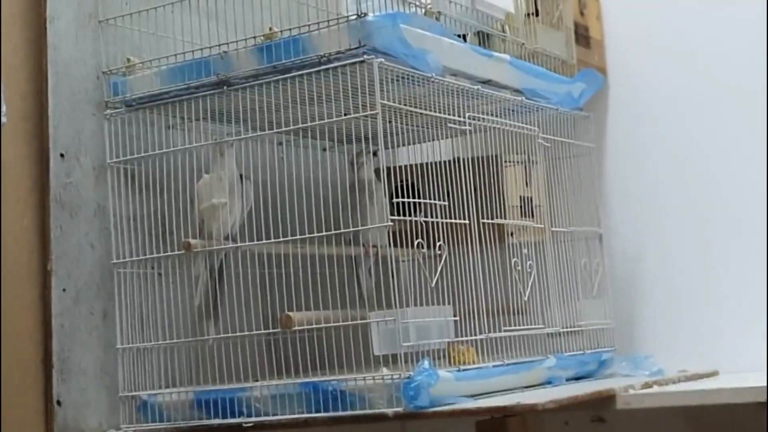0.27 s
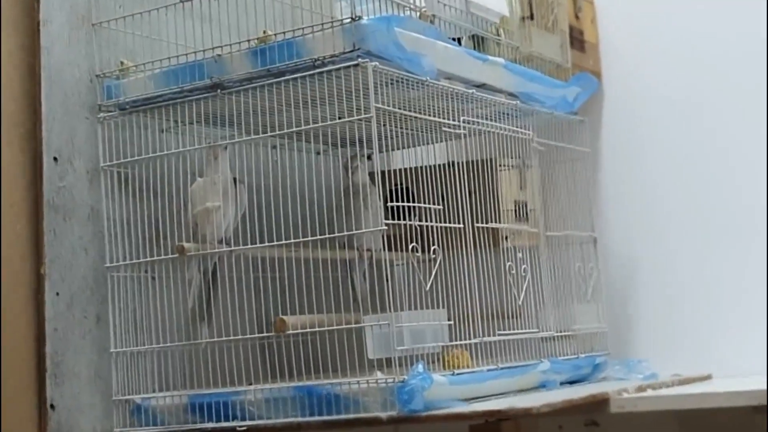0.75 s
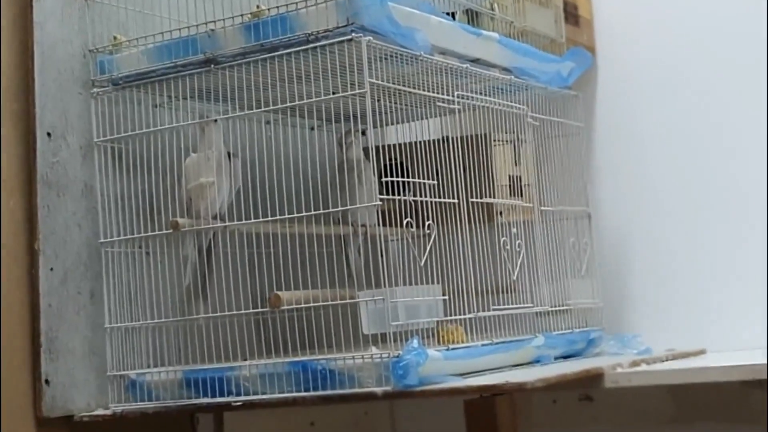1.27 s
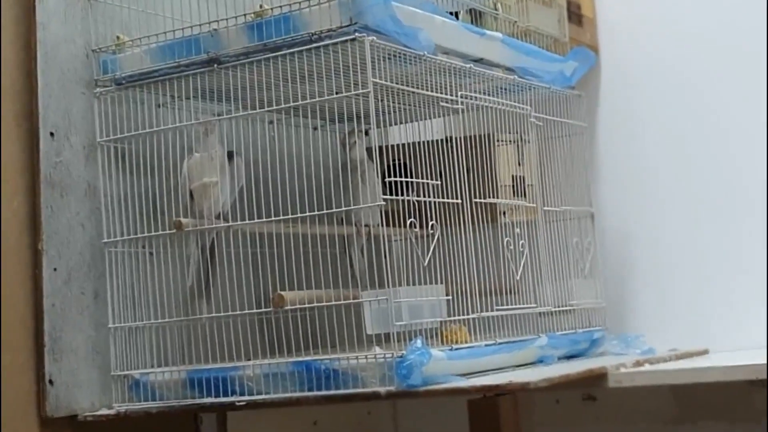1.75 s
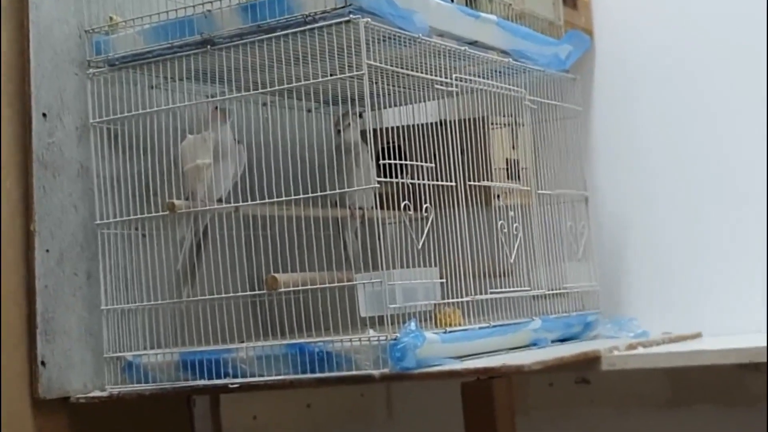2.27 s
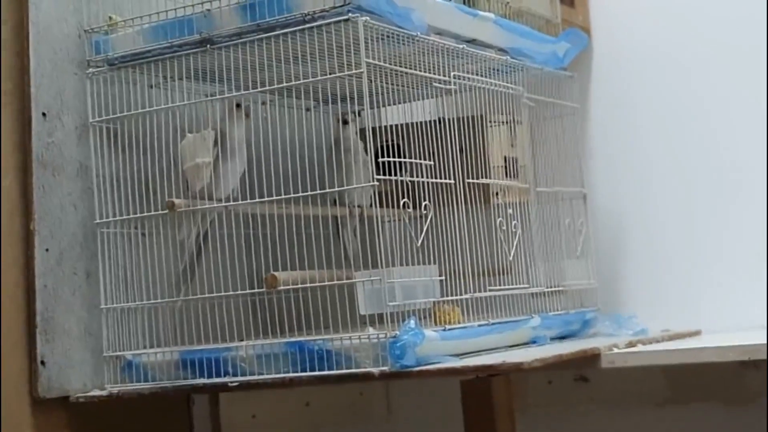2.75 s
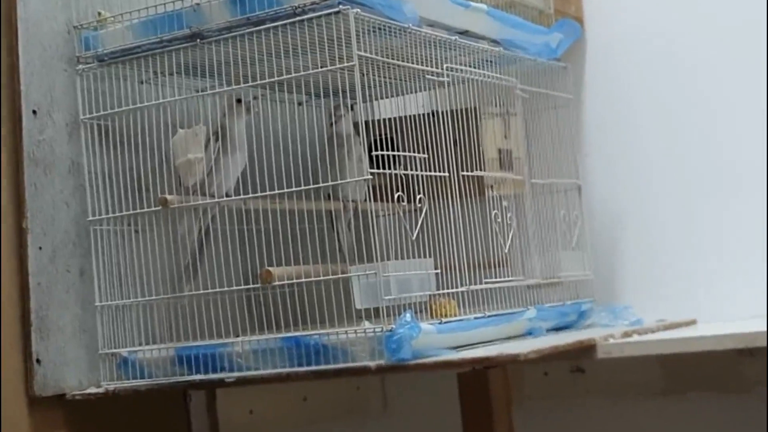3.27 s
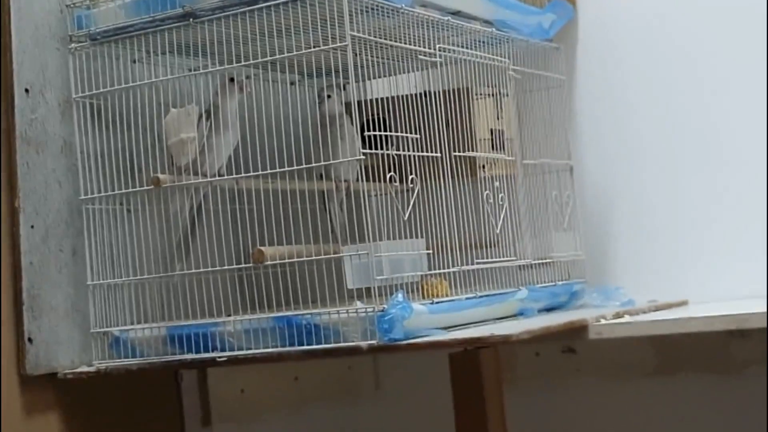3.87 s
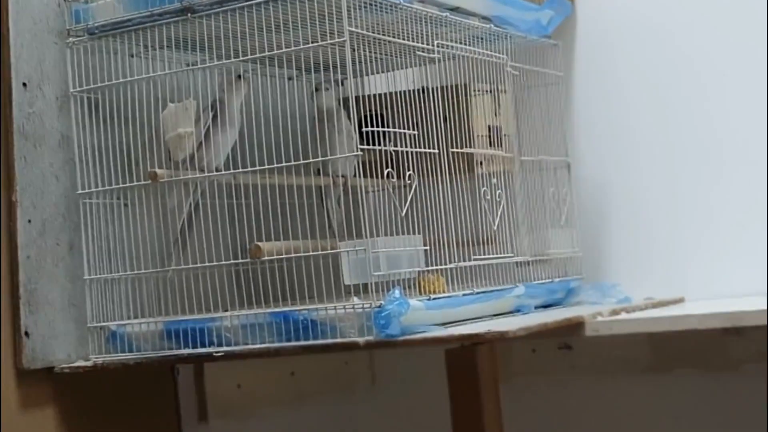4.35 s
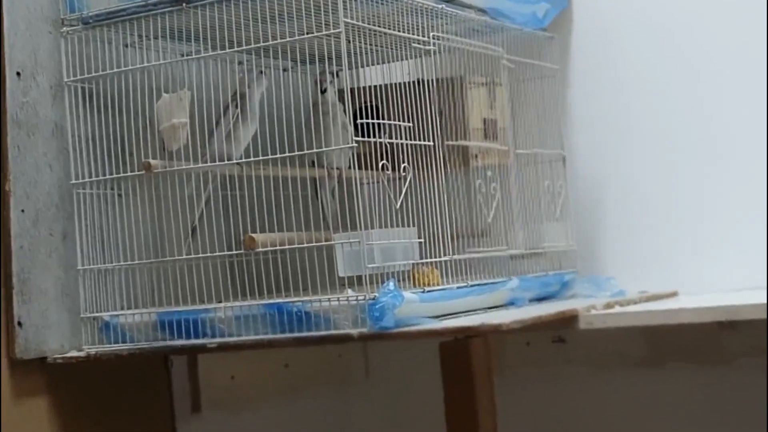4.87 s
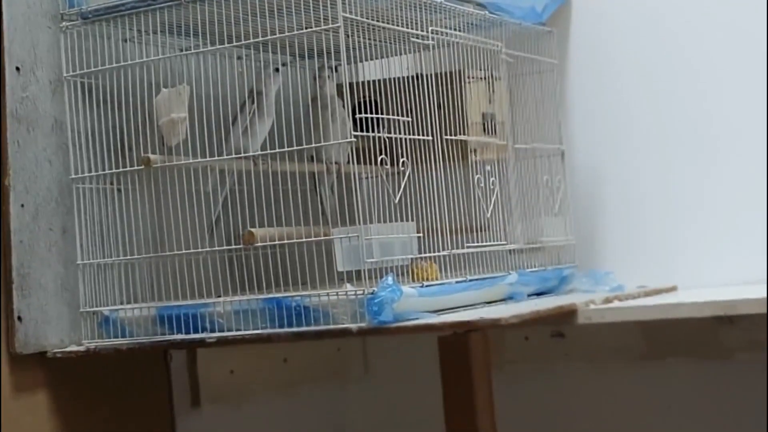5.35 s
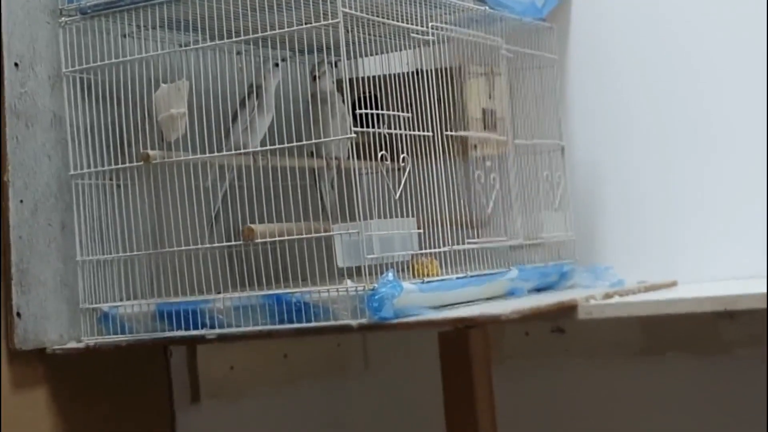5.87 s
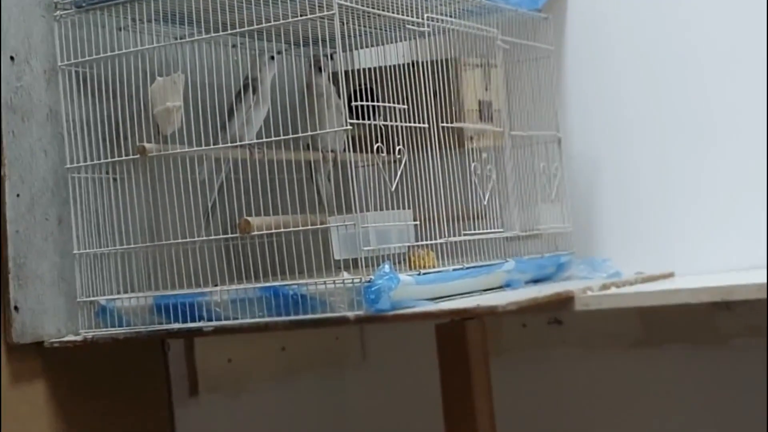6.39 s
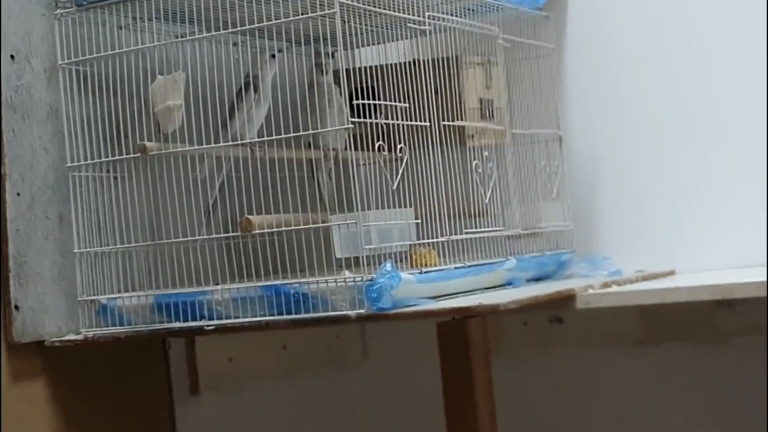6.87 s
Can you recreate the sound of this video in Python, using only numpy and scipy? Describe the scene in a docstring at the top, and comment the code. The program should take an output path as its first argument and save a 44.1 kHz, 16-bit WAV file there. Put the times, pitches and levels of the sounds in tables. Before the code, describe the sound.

Motors hum low in a small, hard-walled room. Something bumps dully elsewhere in the house and leaves a fading rumble. A cockatiel in a wire cage gives two harsh chirps and some soft warbles, then five louder rising whistles, each answered by a thin, hoarse note that hooks downward. One last quiet warble follows. The bird is fairly near the microphone, slightly to the right, with a short echo.

```python
"""A cockatiel in a wire cage in a small hard-walled room. Two motors hum and beat slowly throughout.
At 0.4 s something bumps dully elsewhere in the house and leaves a low rumble. From 1.2 s the bird sings,
its syrinx buzzing through throat and beak: two harsh chirps, soft warbles, a thin note that hooks down.
From 2.7 s come five rising whistles, each answered by such a hook; at 5.5 s, a last quiet warble."""
import sys
import numpy as np
from scipy import signal
from scipy.fft import rfft, irfft, next_fast_len
from scipy.io import wavfile
from scipy.ndimage import uniform_filter1d

SR = 44100
rng = np.random.default_rng(int(sys.argv[2]) if len(sys.argv) > 2 else 0)


def put_to_file(sound):
    """Save the sound as 16-bit audio at rate SR, in the file named by the first command-line argument."""
    columns = np.atleast_2d(sound).T  # one column per channel
    safe = np.clip(columns, -1, 1)
    whole_steps = np.round(safe * 32767)
    wavfile.write(sys.argv[1], SR, whole_steps.astype(np.int16))


N = 313992
TIME_S = np.arange(N) / SR
BINS_HZ = np.arange(N // 2 + 1) * SR / N

# room noise: (frequency [Hz], relative density [dB])
AIR_COLOUR = [(12, -39.5), (22, -15.5), (45, -6.5), (75, -19.5), (105, -16), (170, -14), (250, -15),
              (345, -21), (600, -23.5), (880, -27.5), (2900, -40), (6300, -52.5), (9000, -62), (16000, -65)]
# diffuse sound: (frequency [Hz], left-right correlation [0-1])
CORRELATION = [(30, 0.77), (170, 1), (350, .62), (700, 0.31), (1500, 0.025), (12000, 0.032)]
# deep hum: (time [s], level [dB])
MOTOR_LEVEL = [(0, -43.5), (3.8, -45), (5, -50), (6.3, -45.5)]
# higher motor lines: (frequency [Hz], level [dB], sway [dB])
MOTOR_LINES = [(57.6, -55, 1), (100, -56.5, 1), (114.9, -59, 1), (146.8, -55.5, 2), (441, -59, 2)]
# faint rustles: (time [s], level [dB], half length [s])
RUSTLES = [(.37, -68.5, 0.1), (2.634, -61, 0.0042), (4.326, -60, 0.0027), (5.988, -74, 0.2)]
# knocks of the bump: (start [s], level [dB], rise [s], t60 [s])
KNOCKS = [(0.367, -33.5, 0.019, 0.47), (.398, -33.5, 0.0096, 0.25), (0.423, -29, 0.0031, 0.22),
          (.452, -35.5, .004, 1)]
# noise spectra: (frequency [Hz], relative density [dB])
RUSTLE_COLOUR = [(3000, -31), (6000, 6), (9500, -12), (11500, 6), (13200, -2), (16000, -14)]
KNOCK_COLOUR = [(26, -53), (45, -29), (113, -3.5), (146, -15.5), (276, -12.5), (316, -18.5), (542, -17),
                (882, -31.5), (1150, -33.5), (2500, -45), (3250, -91), (5500, -120)]
RUMBLE_COLOUR = [(40, -22), (80, -3), (110, -0.5), (180, -9.5), (400, -24), (1500, -60)]

# listening points, left then right: (x [m], y [m], z [m])
EARS_M = [(1.3, 1.07, 1.4), (1.24, 1.2, 1.41)]
ROOM_M, BIRD_M = (3.7, 2.9, 2.6), (.35, .55, 1.6)
# reverb decay: (frequency [Hz], t60 [s])
ROOM_T60 = [(100, 1), (1400, 0.74), (2300, 0.53), (4000, 0.6), (6000, 0.54), (9000, 0.29), (15000, .25)]
# reverb colour: (frequency [Hz], gain [dB])
ROOM_COLOUR = [(1300, 2), (2200, 2), (3000, 1), (4200, 2), (6000, 1), (8500, 4), (12500, 2.5)]
# echoes off nest box and cage tray: (delay [ms], left gain, right gain)
CAGE_ECHOES = [(.5, 0.039, .1), (2.249, 0.067, 0.1), (3.099, 0.047, -0.12), (5.502, 0.13, 0.16)]
# peaks and dips of the bird's corner: (frequency [Hz], width [Hz], gain [dB])
CORNER_BANDS = [(1445, 90, 1.5), (1538, 51, -0.5), (1980, 17, 0), (2000, 18, -7), (2019.5, 37, 4.5),
                (2076, 67, -1), (2186, 21, 7), (2205, 50, -6.5), (2447, 13, -2), (3167, 50, 2.5),
                (3654, 10, 5.5), (3804, 82, 4.5), (4440, 90, -8.5)]
# direct path, bird facing away: (frequency [Hz], gain [dB])
SHADOW = [(1300, -2.5), (2200, -3), (4000, -1.5), (6000, -2.5), (8500, -3), (12500, -6.5), (16000, -3.5)]

# turbulence in the syrinx: (frequency [Hz], gain [dB])
RASP_TILT = [(700, -40), (1500, -3), (2600, 1.5), (4200, -11.5), (8000, -9.5), (12500, 5)]
# throat and beak response: (frequency [Hz], gain [dB])
CHIRP_THROAT = [(1900, -27), (2600, -0.5), (3200, 3.5), (4000, -4), (4800, -15.5), (5500, -10.5),
                (7600, -20.5), (9000, -52), (10500, -34.5), (14200, -24), (15800, -40)]
WARBLE_THROAT = [(2600, 4), (3000, 3), (3700, -8), (4700, -12), (5800, -17), (7500, -26), (9300, -38),
                 (11500, -21), (14000, -20), (15800, -35)]
WHISTLE_THROAT = [(2800, -3.5), (3500, -0.5), (4000, 2), (4500, -3), (5100, -16.5), (5800, -6.5),
                  (6600, -24.5), (7500, -31), (9300, -35), (10500, -35), (12400, -23), (15500, -31.5)]
HOOK_THROAT = [(2800, -7.5), (4500, -0.5), (5200, 0), (6500, -6.5), (7600, -13), (9500, -21),
               (11000, -10.5), (12400, -1), (14000, -17), (15500, -9.5)]
# note contours: (stage [0 start, 1 top, 2 end], pitch [0 low, 1 top], level [dB], overtones [dB],
# roughness [0-1])
CHIRP_SHAPE = [(0, 0, -21.5, 12, .3), (.45, 0, -11.5, 8, .15), (.72, .66, 2, 2.5, .12),
               (1, 0.97, -1, -3.5, .03), (1.5, .75, -5, -2.5, .7), (2, -0.038, -8, 1.5, .3)]  # thin buzz, leap, break
WHISTLE_SHAPE = [(0, 0, -17.5, -2, .55), (.28, 0.046, -2, -7.5, 0.3), (.52, .28, -8, 7.5, 0.06),
                 (.78, .68, -3, 1.5, 0.2), (1, 1, 0.5, -5.5, 0.2), (1.55, .95, 0.5, -10.5, .08),
                 (2, .72, -9.5, -10.5, 0.2)]  # hold, shrill climb, pure top
HOOK_SHAPE = [(0, .85, -18, 2, 0.2), (.42, .77, -12.5, 3, .1), (.78, .93, -8.5, 4, 0),
              (1, 0.98, 1, -0.5, 0), (1.4, .86, -0.5, 3.5, .22), (1.7, .42, -10, 3, 0.8),
              (2, 0, -23.5, 2.5, 0.6)]  # dip, swell, hoarse dive
# notes, levels added to the contour's: (start [s], climb [s], after top [s], opening [Hz], low [Hz],
# top [Hz], level [dB], opening boost [dB], overtones re fundamental [dB], treble [dB])
CHIRPS = [(1.193, .063, .032, 1315, 1310, 1628, -29, -1, 1.5, 1),
          (1.655, .066, 0.021, 1292, 1318, 1844, -24, -1, -2, 2.5)]
WHISTLES = [(2.683, .07, .068, 1793, 1767, 2173, -13, -3, -6, 2.5),
            (3.251, 0.12, .03, 1793, 1739, 2145, -15.5, -1, -7.5, -0.5),
            (3.867, 0.11, .042, 1753, 1780, 2071, -16, 0.5, -5, -2),
            (4.385, .108, .037, 1831, 1806, 2252, -16, 2, -2, -3.5),
            (4.92, 0.11, 0.021, 1820, 1842, 2153, -14.5, -2.5, -5, 0.5)]
HOOKS = [(2.459, .052, .029, 1766, 1349, 2047, -24, 13, -31, -3.5),
         (2.95, .078, .037, 2235, 1206, 2502, -27.5, 2.5, -31, 2.5),
         (3.565, 0.068, 0.033, 2140, 1330, 2593, -23.5, -1, -35, 0),
         (4.122, 0.081, 0.039, 2466, 1418, 2584, -21.5, -1, -33.5, -0.5),
         (4.638, .085, .041, 2450, 1310, 2543, -18, -0.5, -31.5, 5.5),
         (5.174, 0.084, 0.041, 2370, 1220, 2568, -19, 1, -30, -2.5)]
# soft slurs: (start [s], length [s], opening [Hz], middle [Hz], closing [Hz], level [dB],
# overtones re fundamental [dB], roughness [0-1], treble [dB])
WARBLES = [(1.899, 0.081, 1950, 1485, 1396, -32, -17.5, 0.45, -0.5),
           (2.028, 0.061, 1538, 1325, 1218, -43.5, -12, 0.54, -1),
           (2.183, .04, 1566, 1430, 1336, -39.5, -10.5, .3, 6),
           (2.234, 0.091, 1338, 1456, 1539, -29.5, -9, .12, 3.5),
           (2.421, 0.0417, 2073, 2000, 1800, -33.5, -29, 0.1, 0),
           (5.536, .067, 1286, 1328, 1359, -38.5, -9.5, 0.1, -11),
           (5.601, 0.05, 1370, 1421, 1280, -40.5, -7, 0.11, -3.5)]


def from_db(db):
    """Decibels to gain."""
    return 10 ** (np.asarray(db) / 20)


def unit_rms(x):
    """Scale to unit power."""
    return x / np.sqrt(np.mean(x ** 2) + 1e-20)


def at_hz(table, hz):
    """Interpolate over log frequency."""
    table_hz, value = np.transpose(table)
    return np.interp(np.log(np.maximum(hz, 1)), np.log(table_hz), value)


def wander(rate_hz, size):
    """Low-passed random motion, rms about 1."""
    span = next_fast_len(size + SR // 10)
    hz = np.arange(span // 2 + 1) * SR / span
    return unit_rms(irfft(rfft(rng.standard_normal(span)) / (1 + (hz / rate_hz) ** 4), span))[:size]


def diffuse_noise(colour):
    """Stereo noise, correlated in the bass only; rms 1."""
    mid, side = rfft(rng.standard_normal((2, N))) * from_db(at_hz(colour, BINS_HZ))
    alike = at_hz(CORRELATION, BINS_HZ)
    return unit_rms(irfft(np.sqrt(1 + alike) * mid + np.sqrt(1 - alike) * side * [[1], [-1]], N))


def motors(fast_hz=48.95, slip_hz=.715, in_step_s=3.62, slower_db=-2, drift_hz=.93):
    """Two motors at nearly the same speed beat under unsteady higher lines."""
    rad_per_hz = 2 * np.pi * (TIME_S - in_step_s)
    pair = np.sin(fast_hz * rad_per_hz) + from_db(slower_db) * np.sin((fast_hz - slip_hz) * rad_per_hz)
    hum = from_db(np.interp(TIME_S, *np.transpose(MOTOR_LEVEL))) * pair
    for hz, db, sway_db in MOTOR_LINES:
        gain = from_db(db + sway_db * wander(rate_hz=6, size=N))
        line_hz = hz + drift_hz * wander(rate_hz=3.12, size=N)
        hum += gain * np.sin(2 * np.pi * np.cumsum(line_hz) / SR)
    return np.sqrt(2) * hum


def rustles():
    """Two soft hissy swells and two tiny ticks."""
    envelope = sum(from_db(db) * np.exp(-.5 * ((TIME_S - s) / half_s) ** 2) for s, db, half_s in RUSTLES)
    return envelope * diffuse_noise(RUSTLE_COLOUR)


def rumble(start_s=.37, rise_s=.097, boom_db=-35, boom_t60_s=1, linger_db=-44.5, linger_t60_s=16):
    """The house booms after the bump: quick drop, slow fade."""
    age_s = TIME_S - start_s
    decay_s = np.maximum(age_s - rise_s, 0)
    boom = from_db(boom_db - 60 * decay_s / boom_t60_s)
    linger = from_db(linger_db - 60 * decay_s / linger_t60_s)
    return np.clip(age_s / rise_s, 0, 1) * np.hypot(boom, linger) * diffuse_noise(RUMBLE_COLOUR)


def bump():
    """Muffled knocks, close together, add in power."""
    power = 0
    for start_s, db, rise_s, t60_s in KNOCKS:
        age_s = TIME_S - start_s
        decay = from_db(db - 60 * np.maximum(age_s - rise_s, 0) / t60_s)
        power += decay ** 2 * np.clip(age_s / rise_s, 0, 1)
    return np.sqrt(power) * diffuse_noise(KNOCK_COLOUR)


def wall_reflections(ear_m, order=9, merge_s=.043):
    """Mirror images of the bird arrive ever denser, then merge into noise."""
    n = np.arange(-order, order + 1)
    x, y, z = [(n + n % 2) * side + (1 - 2 * (n % 2)) * bird - ear
               for side, bird, ear in zip(ROOM_M, BIRD_M, ear_m)]
    path_m = np.sqrt(x[:, None, None] ** 2 + y[:, None] ** 2 + z ** 2).ravel()
    sign = 1 - 2 * ((n[:, None, None] + n[:, None] + n) % 2).ravel()
    arrival = np.round((path_m - path_m.min()) / 343 * SR).astype(int)
    distinct = unit_rms(np.bincount(arrival, sign / path_m)[:int(merge_s * SR)])
    return np.concatenate([distinct, rng.standard_normal(SR)[len(distinct):]])


def room(x, early_db=1, early_t60_s=.15, late_db=-8, build_s=.0081):
    """Strong early reflections, then a tail that dies sooner in the treble."""
    t = TIME_S[:SR]

    def decay_power(db, t60_s):
        power = from_db(-60 * t / t60_s) ** 2
        return from_db(db) ** 2 * power / power.sum()

    hz = np.arange(SR // 2 + 1)
    arrivals = rfft([wall_reflections(ear_m) for ear_m in EARS_M])
    centres_hz = np.geomspace(1000, 16000, 9)
    response = 0
    for centre_hz, share in zip(centres_hz, np.eye(len(centres_hz))):
        band = irfft(arrivals * at_hz(np.column_stack([centres_hz, share]), hz), SR)
        power = decay_power(early_db, early_t60_s) + decay_power(late_db, at_hz(ROOM_T60, centre_hz))
        response += band * from_db(at_hz(ROOM_COLOUR, centre_hz)) * np.sqrt(power)
    response *= 1 - np.exp(-t / build_s)  # first reflections are sparse
    return signal.fftconvolve(x[None], response, axes=1)[:, :N]


def corner(x):
    """Narrow peaks and dips in series; a note flutters as it glides through."""
    for hz, width_hz, db in CORNER_BANDS:
        half_rad, gain = np.pi * width_hz / SR, from_db(db / 2)
        tuning = -2 * np.cos(2 * np.pi * hz / SR)
        b = [1 + half_rad * gain, tuning, 1 - half_rad * gain]
        a = [1 + half_rad / gain, tuning, 1 - half_rad / gain]
        x = signal.lfilter(b, a, x + 1e-18)
    return x


def delayed(x, ms):
    """Fractional-sample delay."""
    return irfft(rfft(x) * np.exp(-2j * np.pi * BINS_HZ * ms / 1000), N)


def with_treble(throat, treble_db, from_hz=5900, full_hz=10000):
    """Throat response with one note's treble shelf."""
    return [(hz, db + treble_db * at_hz([(from_hz, 0), (full_hz, 1)], hz)) for hz, db in throat]


def climb(shape, start_s, climb_s, after_s, opening_hz, low_hz, top_hz, db, opening_db, overtones_db):
    """Stretch a shape to one note's contour."""
    stage, height, shape_db, bright_db, rough = np.transpose(shape)
    times_s = start_s + np.interp(stage, [0, 1, 2], [0, climb_s, climb_s + after_s])
    pitch_hz = np.append(opening_hz, low_hz + (top_hz - low_hz) * height[1:])
    level_db = db + shape_db + opening_db * np.maximum(1 - stage, 0)
    return times_s, pitch_hz, level_db, overtones_db + bright_db, rough


def slur(start_s, length_s, opening_hz, middle_hz, closing_hz, db, overtones_db, rough, edge_db=-6.5):
    """Warble contour: pitch and level follow parabolas."""
    along = np.linspace(-1, 1, 9)
    times_s = start_s + length_s * (along + 1) / 2
    pitch_hz = np.polyval(np.polyfit([-1, 0, 1], [opening_hz, middle_hz, closing_hz], 2), along)
    return np.broadcast_arrays(times_s, pitch_hz, db + edge_db * along ** 2, overtones_db, rough)


def syrinx(contour, throat, jitter, flutter_hz, shimmer, split_db, rasp_db, edge_s=.0037, settle_s=.04):
    """A membrane buzzes on a gliding pitch; throat and beak colour its overtones."""
    times_s, *curves = contour
    start, stop = int(times_s[0] * SR), int((times_s[-1] + edge_s) * SR)
    t = TIME_S[start:stop]
    age_s = t - t[0]
    pitch_hz, level_db, bright_db, rough = [uniform_filter1d(np.interp(t, times_s, curve), size=300)
                                            for curve in curves]
    # the membrane quivers more under strain
    strain = .2 + np.clip(rough, 0, 1)
    phase = 2 * np.pi * np.cumsum(pitch_hz * (1 + jitter * strain * wander(flutter_hz, len(t)))) / SR
    shake = 1 + shimmer * strain * wander(flutter_hz, len(t))
    k = np.arange(2, 14)[:, None]
    throat_db = at_hz(throat, k * pitch_hz)
    gains = from_db(throat_db) * np.clip((SR * .4 - k * pitch_hz) / 1000, 0, 1)
    gains *= from_db(bright_db) / np.linalg.norm(gains, axis=0)
    # until settled, cycles alternate strong and weak: lines between the harmonics
    unsettled = 1 / (1 + (age_s / settle_s) ** 4)
    between = from_db(at_hz(throat, (k - .5) * pitch_hz) - throat_db) * np.sin((k - .5) * phase)
    overtones = np.sum(gains * (np.sin(k * phase) + from_db(split_db) * unsettled * between), axis=0)
    # turbulence, chopped by each cycle
    chopped = rng.standard_normal(len(t)) * (1 + np.sin(phase))
    hz = np.arange(len(t) // 2 + 1) * SR / len(t)
    rasp = unit_rms(irfft(rfft(chopped) * from_db(at_hz(throat, hz) + at_hz(RASP_TILT, hz)), len(t)))
    rasp *= from_db(rasp_db + bright_db) * strain ** 2 * (1 + unsettled)
    gate = np.clip(np.minimum(age_s, t[-1] - t) / edge_s, 0, 1)
    envelope = np.sqrt(2) * shake * from_db(level_db) * np.sin(gate * np.pi / 2) ** 2
    return np.pad(envelope * (np.sin(phase) + overtones + rasp), (start, N - stop))


def cockatiel():
    """Four kinds of note from one syrinx."""
    chirps = sum(syrinx(climb(CHIRP_SHAPE, *note), with_treble(CHIRP_THROAT, treble_db),
                        jitter=.009, flutter_hz=400, shimmer=.4, split_db=-12, rasp_db=-12)
                 for *note, treble_db in CHIRPS)
    warbles = sum(syrinx(slur(*note), with_treble(WARBLE_THROAT, treble_db),
                         jitter=.018, flutter_hz=200, shimmer=.45, split_db=-14, rasp_db=-3)
                  for *note, treble_db in WARBLES)
    whistles = sum(syrinx(climb(WHISTLE_SHAPE, *note), with_treble(WHISTLE_THROAT, treble_db),
                          jitter=.016, flutter_hz=110, shimmer=.28, split_db=-17, rasp_db=-16)
                   for *note, treble_db in WHISTLES)
    hooks = sum(syrinx(climb(HOOK_SHAPE, *note), with_treble(HOOK_THROAT, treble_db),
                       jitter=.03, flutter_hz=350, shimmer=.4, split_db=-18, rasp_db=5)
                for *note, treble_db in HOOKS)
    return chirps + warbles + whistles + hooks


def scene():
    """Bird louder on the right; low sounds fill the room."""
    bird = corner(cockatiel())
    shadowed = irfft(rfft(bird) * from_db(at_hz(SHADOW, BINS_HZ)), N)
    direct = np.array([from_db(-.5) * shadowed, from_db(6) * delayed(shadowed, ms=.11)])
    echoes = sum(np.outer([left, right], delayed(bird, ms)) for ms, left, right in CAGE_ECHOES)
    reverb = room(bird) * from_db([[-2.2], [1.2]])
    background = motors() + rumble() + bump() + rustles() + from_db(-46) * diffuse_noise(AIR_COLOUR)
    return direct + echoes + reverb + background * from_db([[-.75], [.75]])


def record(dry):
    """Steep low-pass at 15.9 kHz."""
    return signal.sosfilt(signal.ellip(10, .2, 80, 15900, fs=SR, output="sos"), dry)


dry = scene()
out = record(dry)
put_to_file(out)
```